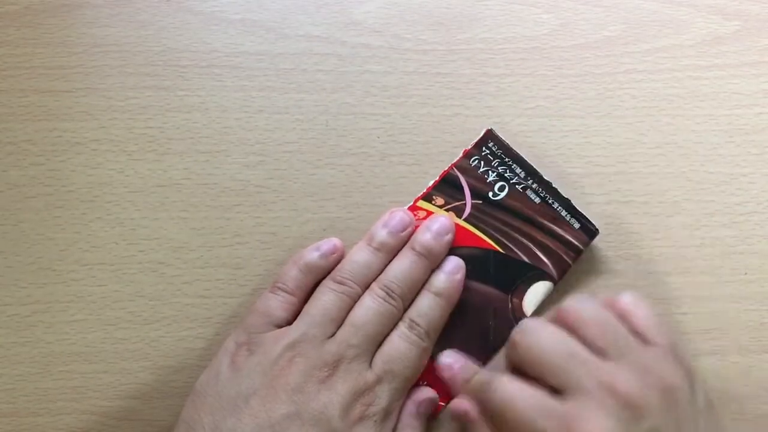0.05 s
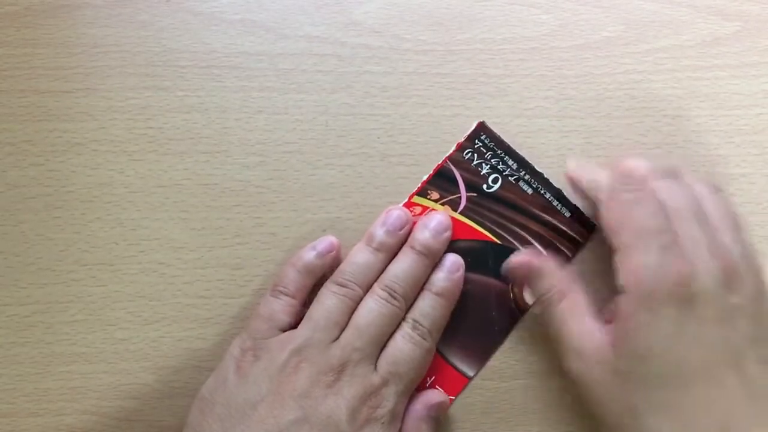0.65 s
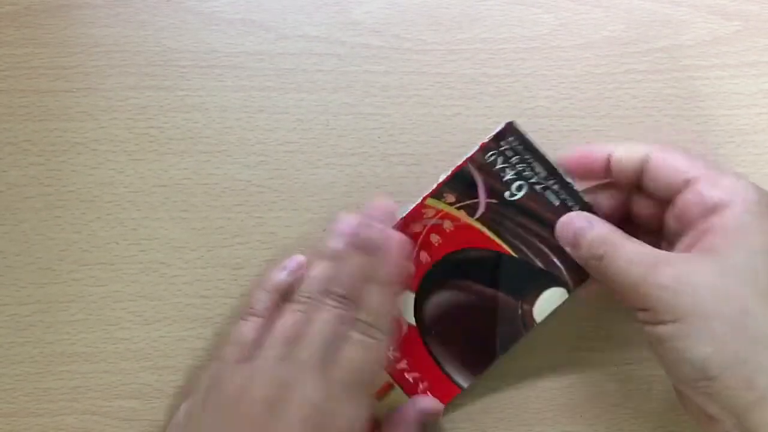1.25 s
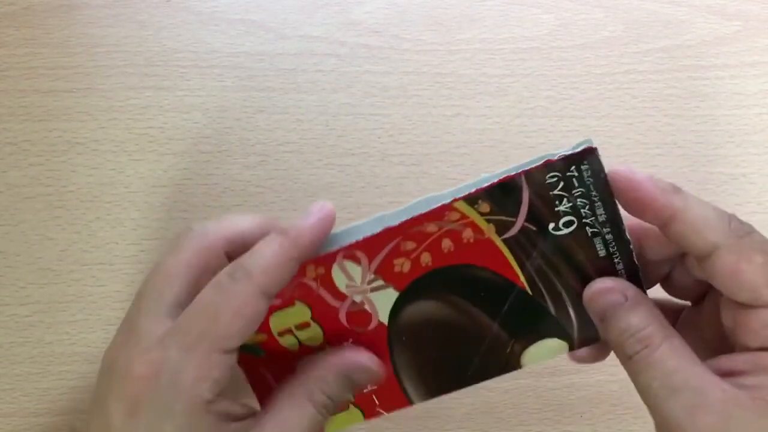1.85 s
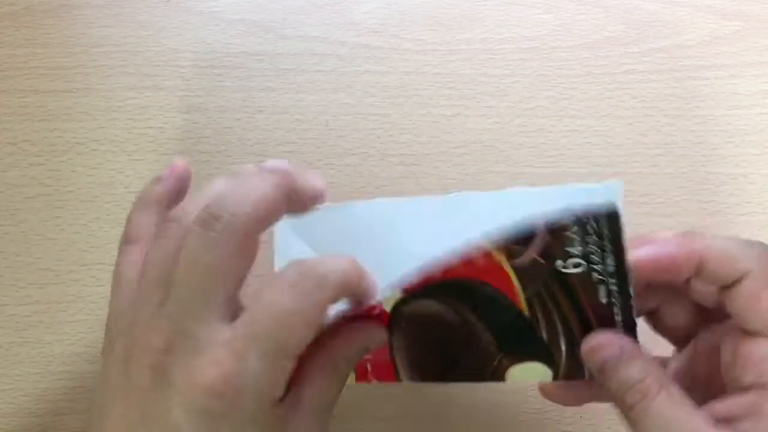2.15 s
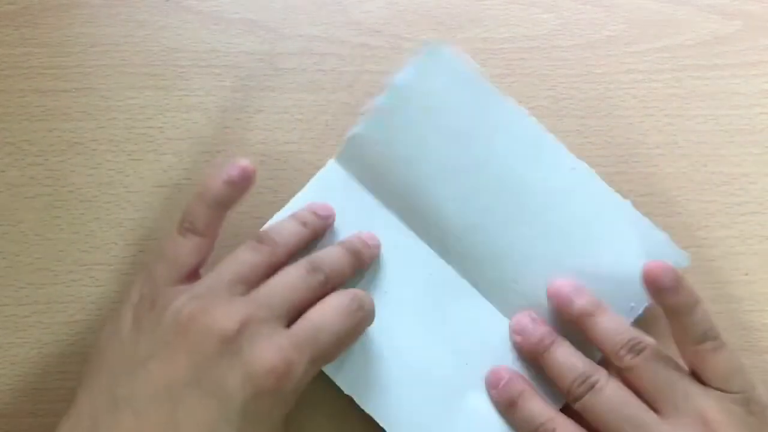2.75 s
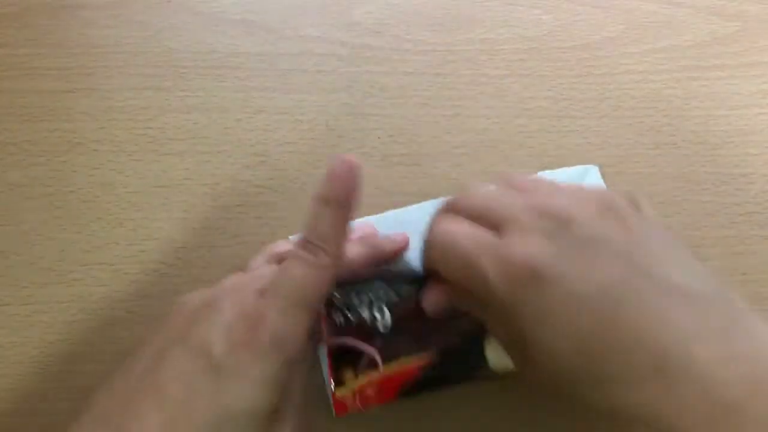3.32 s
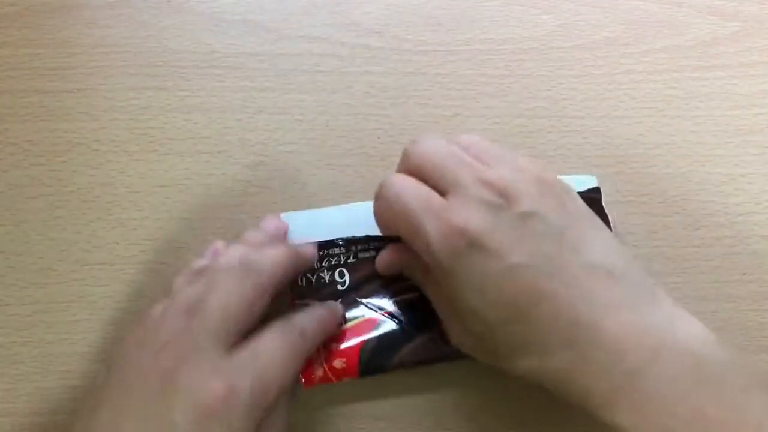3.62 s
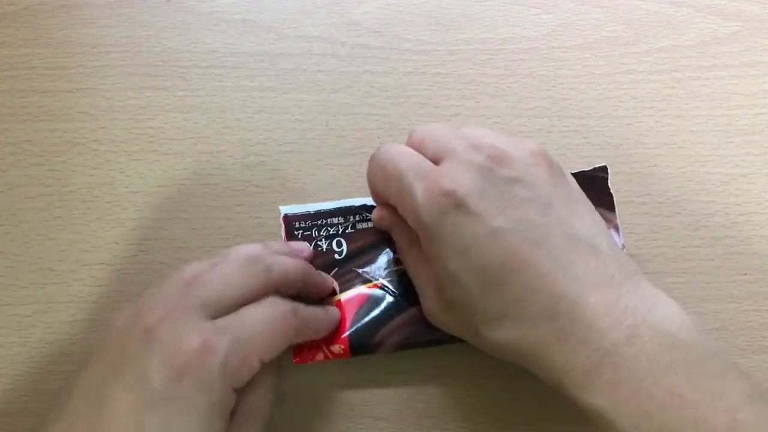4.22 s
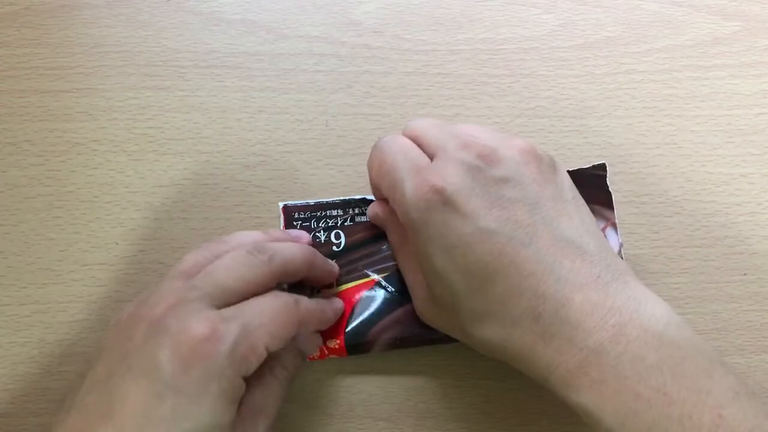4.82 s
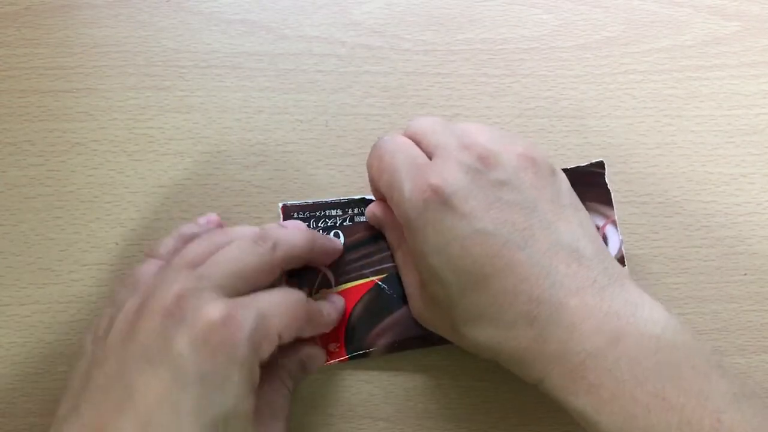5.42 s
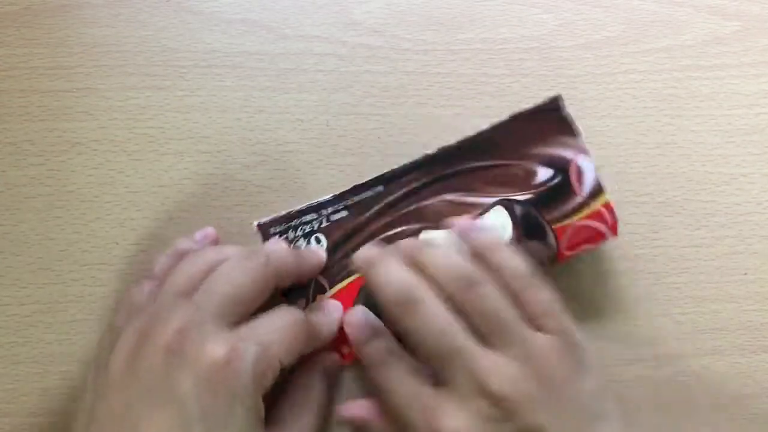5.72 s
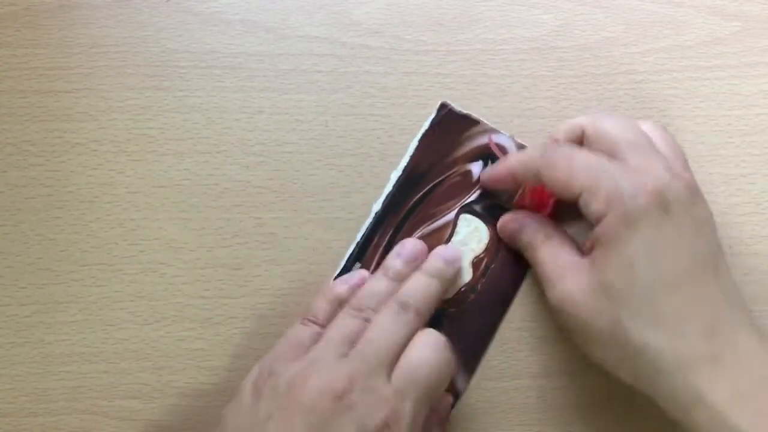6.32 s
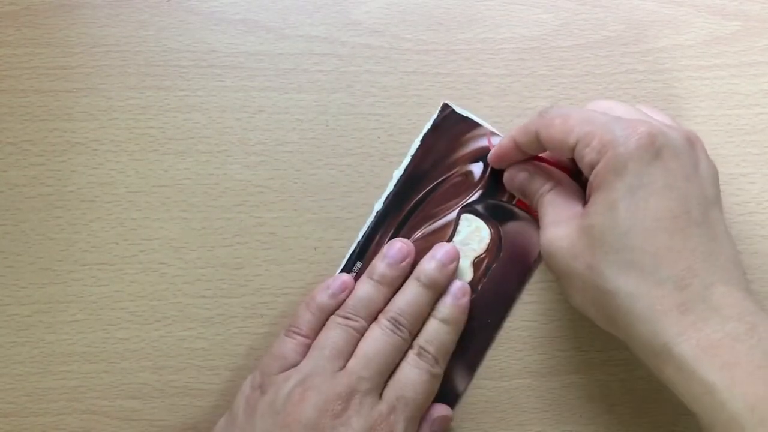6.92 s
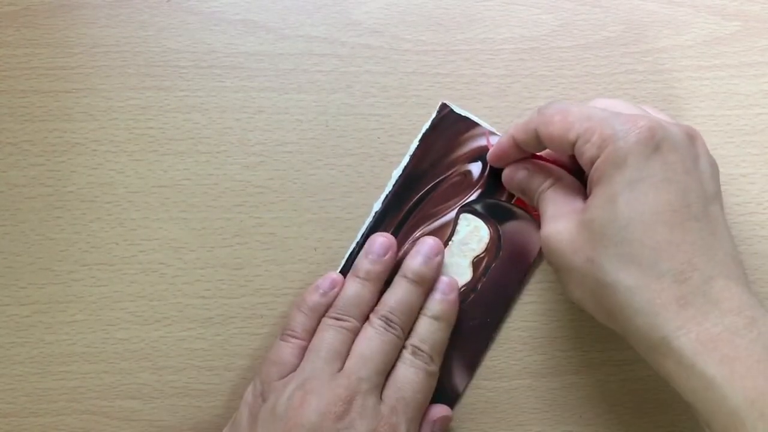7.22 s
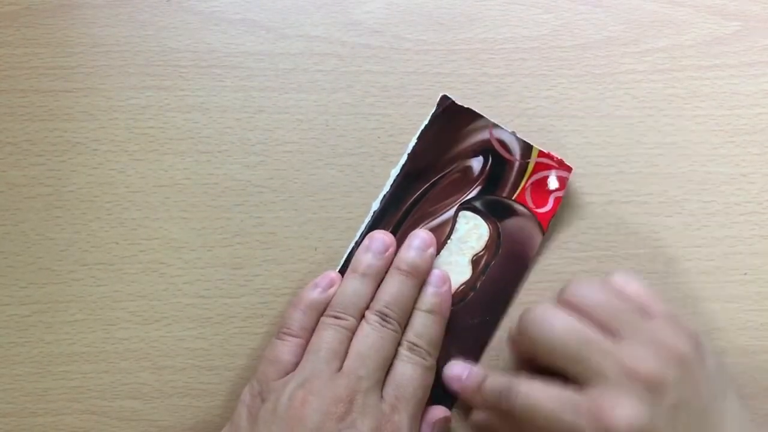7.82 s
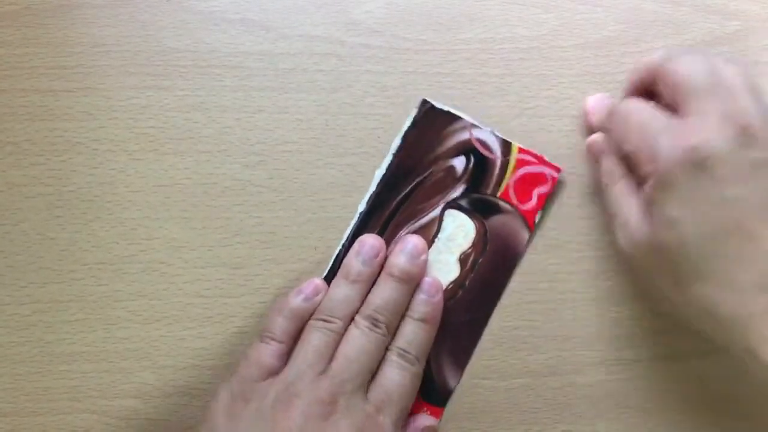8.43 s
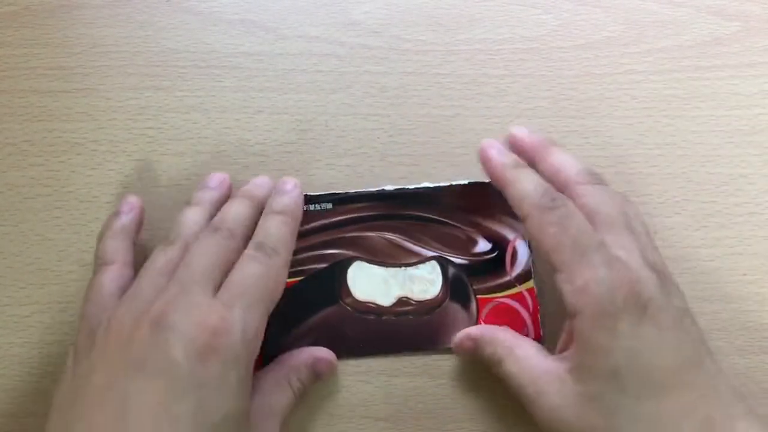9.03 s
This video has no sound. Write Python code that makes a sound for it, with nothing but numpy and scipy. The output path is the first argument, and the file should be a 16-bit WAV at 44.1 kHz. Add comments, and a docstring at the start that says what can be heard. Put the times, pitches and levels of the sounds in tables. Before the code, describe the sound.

Stiff card scrapes, crinkles and clicks in irregular bursts as fingers crease it against a desk in a quiet room.

```python
"""Folding a paperboard wrapper

Close on a wooden desk in a quiet room, one small microphone. Fingers and stiff card slide with a gritty
rustle, creases snap and crunch, the card flips open with a dull pop and presses thud on the desk.
Behind the hands: a low electrical hum, faint air and, early on, a deep drone that slowly sinks."""
import sys
import numpy as np
from scipy import signal
from scipy.fft import rfft, irfft, next_fast_len
from scipy.io import wavfile
from scipy.ndimage import uniform_filter1d

SR = 44100
rng = np.random.default_rng(int(sys.argv[2]) if len(sys.argv) > 2 else 0)


def store_pcm(level_fs):
    """Save levels as 16-bit WAV."""
    pcm = np.round(np.clip(level_fs, -1, 1) * 32767).astype(np.int16)
    wavfile.write(sys.argv[1], SR, np.atleast_2d(pcm).T)


N = 399546
TIME = np.arange(N) / SR

# room tone, the still air: f/Hz, relative density/dB
AIR_SPECTRUM = [(15, -70.5), (25, -42.5), (42, -4), (64, -2.5), (75, -7.5), (101, -18.5), (140, -18.5),
                (227, -20), (297, -24.5), (378, -28), (684, -31.5), (826, -35), (1170, -32.5), (1380, -41),
                (15500, -53)]
# electrical hum: f/Hz, level/dB
HUM_LINES = [(59.6, -58), (134.6, -72)]
# faint rush in the distance: f/Hz, width/Hz, gain/dB
RUSH_RESONANCES = [(1050, 220, 0), (1560, 800, -2)]
# the desk rocking, its top ringing, card slapping on it: f/Hz, width/Hz, gain/dB
ROCKING_MODES = [(67.4, 14, 0)]
DESKTOP_MODES = [(132, 13, 2.5), (203, 32, -8)]
CARD_SLAP_MODES = [(292.5, 47, -1.5), (327.4, 13, 1), (410, 110, -7.5)]
# landings on the desk: t/s, strength/dB, weight/dB (high for the flesh of a hand, low for bare card)
DESK_PRESSES = [(0.356, -48, 1.5), (0.532, -54, -1), (1.055, -55, 2), (1.17, -56, 10), (2.29, -57.5, 13),
                (2.55, -49.5, -8), (2.616, -50, -14), (2.671, -52.5, -14), (3.002, -40.5, 6.5),
                (3.277, -43.5, 9.5), (3.301, -50.5, 14), (3.414, -42.5, -1), (3.478, -47.5, -9),
                (3.521, -52, -5), (3.688, -55.5, 8), (3.743, -53, 8), (4.108, -56, -8.5),
                (4.144, -56.5, -9), (5.472, -54, 3), (5.718, -54, 9), (5.929, -52, -1), (6.286, -46, 6),
                (6.306, -48.5, 14), (7.755, -54, -2), (8.259, -48, -2), (8.489, -54.5, 5)]
# the sheet bending under friction: f/Hz, width/Hz, gain/dB
SHEET_MODES = [(714, 690, -3.5), (1180, 255, 2.5), (1700, 1300, -0.5)]
# hiss of the fibres: f/Hz, relative density/dB
FIBRE_SPECTRUM = [(3000, -32.5), (4700, -1), (5800, -0.5), (7500, -9), (9500, -6.5), (12000, -9),
                  (16000, -15.5)]
# creases snapping and edges striking: t/s, ring/dB, panel pitch/Hz, crack/dB
CREASE_SNAPS = [(0.6964, -59, 3350, -54.5), (1.0217, -46.5, 1710, -54), (1.045, -36, 1360, -61),
                (1.0522, -40, 1860, -43.5), (1.1655, -44.5, 2230, -52), (1.2641, -51, 1860, -49),
                (2.293, -42, 1360, -52.5), (2.548, -26.5, 1150, -62), (2.557, -20, 1185, -48),
                (2.619, -31, 1100, -68), (2.6444, -39.5, 990, -50.5), (2.9972, -32, 2430, -40.5),
                (3.0033, -30.5, 3070, -58), (3.0125, -39, 3880, -50), (3.2684, -51, 2860, -61),
                (3.2779, -42, 3900, -46.5), (3.413, -40, 1190, -54), (3.4813, -32.5, 1230, -63),
                (3.5196, -30, 4950, -38.5), (4.096, -52, 2020, -62), (4.1106, -45.5, 1320, -53),
                (4.774, -62, 1800, -68), (5.015, -67, 1700, -70), (5.7125, -34, 1370, -48.5),
                (5.7218, -43.5, 3360, -45), (6.2526, -47.5, 3310, -52), (6.562, -60.5, 3050, -66),
                (7.5218, -43.5, 3580, -48), (7.7112, -39, 4700, -61), (8.2625, -49.5, 2450, -47),
                (8.937, -73, 3000, -63)]
# creases yielding and edges dragging: peak t/s, ring/dB, panel pitch/Hz, crack/dB
CREASE_CRUNCHES = [(0.785, -52, 3140, -56), (0.895, -44, 2340, -47), (0.953, -54, 2220, -54.5),
                   (1.041, -45, 2360, -46), (2.02, -55, 1090, -64), (2.227, -47.5, 1900, -53.5),
                   (2.766, -38.5, 1850, -60), (2.965, -43.5, 2230, -57), (3.072, -40.5, 4050, -63),
                   (3.199, -47.5, 3000, -46), (3.303, -44.5, 2020, -47.5), (3.414, -43, 970, -52),
                   (3.478, -38.5, 2360, -44.5), (3.517, -39, 3960, -55), (3.638, -45.5, 940, -53.5),
                   (3.746, -44, 1020, -51), (4.146, -49.5, 1360, -58.5), (4.377, -51.5, 1290, -64),
                   (4.524, -43.5, 935, -61), (4.684, -55, 2330, -60), (5.475, -39.5, 1900, -63),
                   (5.482, -47, 2130, -51), (6.174, -42, 3860, -49), (6.292, -43, 2830, -48.5),
                   (6.4, -44, 4750, -52.5), (7.521, -38, 3500, -55), (7.529, -45.5, 2780, -49.5)]
# strokes of fingers and card; the span of card left free sets the pitch:
# t/s, length/s, scrape/dB, flexing/dB, hiss/dB, scrape pitch/Hz
HAND_STROKES = [(0.107, .19, -58, -64, -62, 2200), (0.328, 0.078, -66, -75, -68.5, 3200),
                (0.503, 0.097, -59, -65, -59, 3000), (0.713, .32, -59, -64, -63.5, 2400),
                (0.849, 0.042, -50, -62, -54, 2400), (1.14, 0.044, -64, -63, -60.5, 2500),
                (1.241, 0.28, -65.5, -65, -63.5, 3000), (1.661, 0.18, -78, -74, -68.5, 3400),
                (1.875, 0.079, -73, -75, -63.5, 3400), (1.971, 0.23, -61, -64, -59.5, 3200),
                (2.049, 0.051, -49, -60, -47.5, 3500), (2.292, 0.092, -57, -63.5, -58.5, 3000),
                (2.442, 0.086, -64.5, -63.5, -67, 3000), (2.544, 0.21, -49.5, -51, -55, 3000),
                (2.718, 0.12, -47, -52.5, -56, 2365), (2.839, 0.066, -34, -66, -46.5, 3000),
                (2.898, 0.1, -43.5, -59, -52.5, 2280), (3.018, .11, -49.5, -54.5, -49.5, 4400),
                (3.126, 0.07, -56, -57.5, -52.5, 4000), (3.249, 0.05, -54, -51.5, -52.5, 2990),
                (3.34, 0.1, -58.5, -61.5, -58, 3000), (3.398, 0.027, -39.5, -41.5, -56, 2174),
                (3.452, 0.13, -50.5, -49.5, -52, 3230), (3.648, 0.17, -53.5, -53.5, -57.5, 3430),
                (3.863, 0.13, -59, -57, -62, 3300), (4.03, 0.31, -72, -70, -74.5, 2500),
                (4.332, 0.23, -58, -61.5, -63, 2350), (4.481, 0.04, -46, -51.5, -53, 2350),
                (4.661, 0.036, -59, -65, -66, 2250), (4.808, .13, -65, -63.5, -70, 2200),
                (5.43, 0.043, -47.5, -51.5, -50, 2100), (5.527, 0.31, -51.5, -57.5, -59.5, 2030),
                (5.842, 0.13, -52, -58.5, -56, 2240), (5.988, 0.29, -53.5, -65, -59.5, 2385),
                (6.122, 0.073, -50, -70, -53.5, 3500), (6.27, 0.033, -51, -54, -51, 3400),
                (6.352, .1, -66, -67, -65, 3400), (7.483, 0.044, -54, -55.5, -54.5, 3440),
                (7.08, 0.076, -75, -84, -73, 3200), (7.713, .17, -69, -67.5, -70.5, 3000),
                (7.91, 0.055, -57, -60, -60, 3500), (7.977, 0.084, -55, -62, -62, 2260),
                (8.09, 0.14, -66.5, -71, -68, 2260), (8.178, 0.047, -64, -65.5, -57.5, 3430),
                (8.235, 0.063, -53, -55, -58.5, 2270), (8.394, .07, -68, -73, -64.5, 3500),
                (8.454, 0.079, -55.5, -70, -54.5, 3500), (8.564, .19, -62.5, -74, -63.5, 3600),
                (8.643, 0.072, -55, -70, -57, 3600), (8.78, 0.088, -64, -73, -68, 3600)]
# narrow dips in the microphone's response: f/Hz, width/Hz, depth/0-1
MIC_DIPS = [(4920, 380, 0.4), (10380, 790, .45)]


def from_db(db):
    """Decibels to gain."""
    return 10 ** (np.asarray(db) / 20)


def rms_one(x):
    """Scale to unit power."""
    return x / np.sqrt(np.mean(x ** 2) + 1e-20)


def struck(x, span_s):
    """Scale a blow so that its energy equals unit power over span_s."""
    return x / np.sqrt(np.sum(x ** 2) / (span_s * SR) + 1e-20)


def decay(t, t60):
    """An envelope that falls 60 dB in t60 seconds."""
    return from_db(-60 * t / t60)


def drift(rate):
    """Random wander with about `rate` turns a second, spread 1."""
    knots = rng.standard_normal(N // 20)
    return rms_one(np.interp(TIME * rate, np.arange(len(knots)), knots))


def add(out, s, sound):
    """Mix a sound in at s seconds."""
    i = max(0, round(s * SR))
    out[i:i + len(sound)] += sound[:N - i]


def cut(x, hz, kind, order=2):
    """Causal high- or low-pass."""
    return signal.sosfilt(signal.butter(order, hz, kind, fs=SR, output="sos"), x)


def resonator(hz, width_hz):
    """Coefficients of one resonance, gain 1 at its peak."""
    r = np.exp(-np.pi * width_hz / SR)
    return np.array([1, 0, -1]) * (1 - r * r) / 2, [1, -2 * r * np.cos(2 * np.pi * hz / SR), r * r]


def resonate(x, hz, width_hz):
    """Ring one fixed resonance."""
    return signal.lfilter(*resonator(hz, width_hz), x + 1e-18)


def glide(x, hz, width_share):
    """A resonance whose centre follows a curve, block by block."""
    out, state = np.zeros(N), np.zeros(2)
    for i in range(0, N, 128):
        block = slice(i, i + 128)
        out[block], state = signal.lfilter(*resonator(hz[i], width_share * hz[i]), x[block], zi=state)
    return out


def body(x, modes):
    """Resonances in parallel, signs alternating."""
    return sum((-1) ** k * from_db(db) * resonate(x, hz, width) for k, (hz, width, db) in enumerate(modes))


def colour(x, spectrum):
    """Give a steady texture a smooth spectrum."""
    hz, db = np.transpose(spectrum)
    size = next_fast_len(N)
    bins_hz = np.maximum(np.arange(size // 2 + 1) * SR / size, 1)
    gain = from_db(np.interp(np.log(bins_hz), np.log(hz), db))
    return irfft(rfft(x, size) * gain, size)[:N]


def tone(hz, db, waver_db=2.5, sway_rad=0.41):
    """A low line that wavers a little in level and phase."""
    phase = 2 * np.pi * np.cumsum(hz * np.ones(N)) / SR + sway_rad * drift(4)
    return np.sqrt(2) * from_db(db - waver_db * drift(2.5)) * np.sin(phase)


def room_tone(air_db=-56.5):
    """The quiet room itself: faint air and electrical hum."""
    air = from_db(air_db) * rms_one(colour(rng.standard_normal(N), AIR_SPECTRUM))
    return air + sum(tone(hz, db) for hz, db in HUM_LINES)


def drone(start_s=0.59, rise_s=0.31, end_s=3.5, fall_s=0.72, start_hz=56.2, sag_hz_per_s2=1.3):
    """A deep line swells, throbs and sinks; a distant rush, there from the outset, fades with it."""
    age = np.maximum(TIME - start_s, 0)
    rise = np.minimum(age / rise_s, 1)
    fall = np.clip((end_s - TIME) / fall_s, 0, 1)
    level_db = -50 + 3 * np.cos(2 * np.pi * (TIME - 2.38) / 0.9)   # one throb every 0.9 s
    line = rise * tone(start_hz - sag_hz_per_s2 * age ** 2, level_db)
    rush = cut(body(rng.standard_normal(N), RUSH_RESONANCES), 3000, "low")
    return fall * (line + from_db(-69.5) * rms_one(rush))


def reflections(x, early_db=-9, early_t60=0.031, room_db=-12, room_t60=0.37, wall_cut_hz=4200):
    """The desk and near things answer within milliseconds, then the small room rings on faintly."""
    t = TIME[:SR // 2]
    near, far = rng.standard_normal((2, len(t)))
    near = from_db(early_db) * struck(near * decay(t, early_t60) * (t > .001), 1 / SR)
    far = from_db(room_db) * struck(far * decay(t, room_t60) * (t > .006), 1 / SR)
    return signal.fftconvolve(x, cut(near + far, wall_cut_hz, "low", order=1))[:N]


def presses(contact_t60=0.12, scuff=0.058):
    """A soft, scuffing contact rocks the desk, rings its top and slaps the card against it."""
    out, t = np.zeros(N), TIME[:SR // 3]
    for s, strength_db, weight_db in DESK_PRESSES:
        scuffing = scuff * rng.standard_normal(len(t)) * decay(t, contact_t60)
        force = cut((t == 0) + scuffing, 600, "low")
        # a heavy, soft hand rocks the desk more and damps the slap
        rocking_db, slap_db = -7.5 + weight_db, -6.5 - 0.7 * weight_db
        for modes, db in ((ROCKING_MODES, rocking_db), (DESKTOP_MODES, 0), (CARD_SLAP_MODES, slap_db)):
            top_hz = modes[-1][0]
            thud = cut(body(force, modes), 1.6 * top_hz, "low")
            add(out, s, from_db(strength_db + db) * struck(thud, 0.031))
    return out


def panel(push, hz, width_share=0.35, overtone_db=-9, direct_db=-19):
    """A flexed panel of card: one low mode and a broad cluster above it."""
    ring = resonate(push, hz, width_share * hz) + from_db(overtone_db) * resonate(push, 1.98 * hz, hz)
    return cut(ring + from_db(direct_db) * push, min(1.7 * hz, 7500), "low", order=6)


def crack(push):
    """Breaking fibres sound in the treble only."""
    return cut(cut(push, 4300, "high"), 4990, "low", order=1)


def snap(ring_db, hz, crack_db, wave_t60=0.023, crack_t60=0.025):
    """A panel buckles in an instant: it rings, bending waves die away and a volley of fibres cracks."""
    t = TIME[:SR // 12]
    waves, fibres = rng.standard_normal((2, len(t)))
    kick = struck(1. * (t == 0), .004)
    push = kick + 0.86 * struck(waves * decay(t, wave_t60), .004)
    volley = .4 * kick + struck(fibres * decay(t, crack_t60), .004)
    ring = from_db(ring_db) * struck(panel(push, hz), .0045)
    return ring + from_db(crack_db) * struck(crack(volley), .006)


def ticks(count=60, tick_db=-67, range_db=6, lowest_hz=1200, settle_s=0.29):
    """After a stroke the strained folds settle in tiny ticks, ever more rarely."""
    out = np.zeros(N)
    for which, wait, strength, octaves in rng.random((count, 4)):
        s, length_s, *_ = HAND_STROKES[int(which * len(HAND_STROKES))]
        when = s + length_s - settle_s * np.log(1 - wait)
        db = tick_db + range_db * (strength - .5)
        if when < TIME[-1]:
            add(out, when, snap(db, lowest_hz * 2 ** octaves, crack_db=db - 5))
    return out


def crunches(rise_s=0.0045, fall_s=0.0065, grit_db=1.0, crack_trim_db=-1):
    """A run of tiny fractures swells to a peak and dies away, driving the panel."""
    out, t = np.zeros(N), TIME[:SR // 10] - 1 / 20
    swell = np.exp(np.minimum(t / rise_s, -t / fall_s))
    for s, ring_db, hz, crack_db in CREASE_CRUNCHES:
        size, sign = rng.standard_normal((2, len(t)))
        push = swell * np.sign(sign) * from_db(grit_db * size)
        ring = from_db(ring_db) * struck(panel(push, hz), .007)
        fibres = from_db(crack_db + crack_trim_db) * struck(crack(push), .009)
        add(out, s + t[0], ring + fibres)
    return out


def snaps(crack_trim_db=-1):
    """Creases buckle and edges strike, clear and close."""
    out = np.zeros(N)
    for s, ring_db, hz, crack_db in CREASE_SNAPS:
        add(out, s, snap(ring_db, hz, crack_db + crack_trim_db))
    return out


def stroke_levels(attack_s=0.032, swell_db=1.5, release_db_per_s=245.5, resting_db=-79.5):
    """Scrape, flexing and hiss in dB: each stroke gathers speed, swells and dies; overlaps add in power."""
    power = np.full((3, N), from_db(resting_db) ** 2)   # fingers that only hold the card
    t = TIME[:SR]
    for s, length_s, *levels_db, _ in HAND_STROKES:
        swell = swell_db * (np.sin(np.pi * np.minimum(t / length_s, 1)) - 1 / 2)
        release = release_db_per_s * np.maximum(t - length_s, 0)
        envelope = np.minimum(t / attack_s, 1) * from_db(swell - release)
        for layer, db in zip(power, levels_db):
            add(layer, s, (from_db(db) * envelope) ** 2)
    return 10 * np.log10(power)


def friction(per_s, spread_db):
    """Fibres catch and let go: clicks of uneven size over a smooth bed of tiny ones."""
    sizes = from_db(spread_db * np.minimum(rng.exponential(1, N), 4)) * rng.choice([-1, 1], N)
    catches = sizes * (rng.random(N) < per_s / SR)
    return rms_one(catches) + rng.standard_normal(N)


def cupped_hand(x, from_s=3.58, until_s=5.0, hz=1220, width_hz=160, ring_db=5):
    """A hand cupped over the fold adds a hollow ring for as long as it stays."""
    covered = uniform_filter1d(1. * ((TIME > from_s) & (TIME < until_s)), SR // 20)
    hollow = rms_one(x + from_db(ring_db) * resonate(x, hz, width_hz))
    return covered * hollow + (1 - covered) * rms_one(x)


def surface_scrape(slips, upper_ratio=1.596, upper_db=-2.5, base_db=-1.5):
    """Two wandering resonances on a broad base glide from the pitch of one stroke to that of the next."""
    middles = sorted((s + length_s / 2, hz) for s, length_s, *_, hz in HAND_STROKES)
    pitch = np.interp(TIME, *np.transpose(middles))
    focus_hz = pitch * from_db(.4 * drift(25))
    focus = glide(slips, focus_hz, width_share=0.22)
    upper = from_db(upper_db) * glide(slips, upper_ratio * focus_hz, width_share=0.15)
    base = from_db(base_db) * glide(slips, .88 * pitch, width_share=1)
    return cut(cut(focus + upper + base, 1700, "high"), 6220, "low", order=4)


def fibre_hiss(slips, sheen_db=2.5):
    """The contact angle shifts, so the hiss turns now duller, now brighter."""
    hiss = colour(slips, FIBRE_SPECTRUM)
    sheen = cut(hiss, 6100, "high", order=1)
    return hiss + sheen * (from_db(sheen_db * drift(22)) - 1)


def rubbing(judder_db=1.5, grain_db=1.03):
    """Slips drive the sheet's bending, its surface and its fibres; the hand judders on all three."""
    scrape_db, flex_db, hiss_db = stroke_levels()
    judder = from_db(judder_db * drift(90))
    coarse = friction(per_s=700, spread_db=2.0) * judder
    fine = friction(per_s=5000, spread_db=3.0) * judder
    bending = cut(cut(body(coarse, SHEET_MODES), 470, "high"), 1900, "low", order=4)
    # the harder the sheet is flexed, the more it grumbles against the desk
    grumble = cut(body(coarse, CARD_SLAP_MODES), 700, "low")
    layers = ((grumble, flex_db - 8), (cupped_hand(bending), flex_db),
              (surface_scrape(coarse + fine), scrape_db - 2), (fibre_hiss(fine), hiss_db + 1))
    return sum(from_db(db + grain_db * drift(60)) * rms_one(sound) for sound, db in layers)


def scene():
    """The handwork close to the microphone, the room behind it, in mono."""
    card = rubbing() + snaps() + crunches() + ticks()
    return (card + reflections(card) + presses() + room_tone() + drone())[None]


def record(dry):
    """A small microphone with two dips in the treble and a steep cut above 15.9 kHz."""
    for hz, width_hz, depth in MIC_DIPS:
        dry = dry - depth * resonate(dry, hz, width_hz)
    return signal.sosfilt(signal.ellip(10, .2, 70, 15900, fs=SR, output="sos"), dry)


dry = scene()
out = record(dry)
store_pcm(out)
```